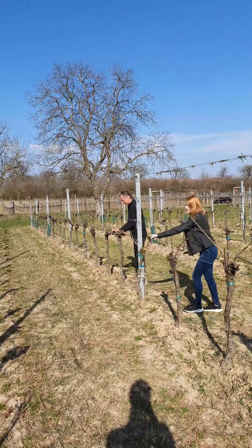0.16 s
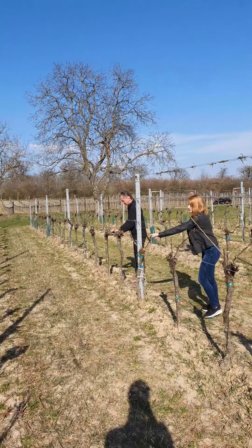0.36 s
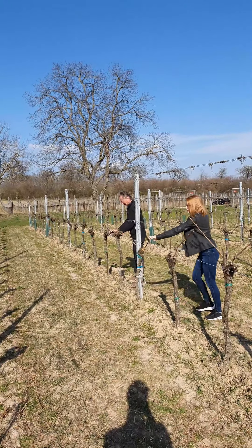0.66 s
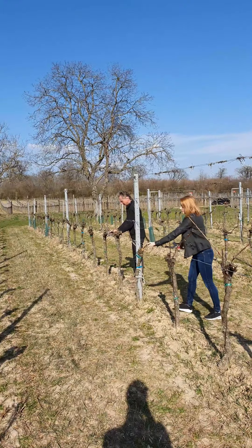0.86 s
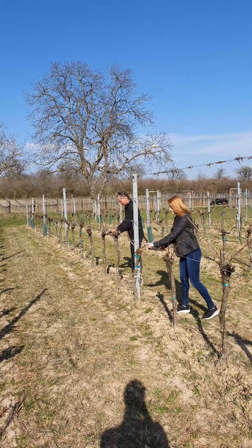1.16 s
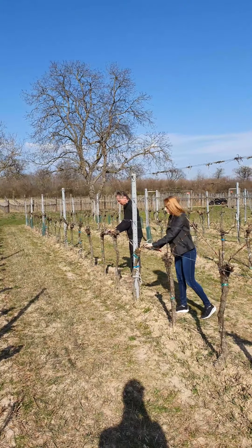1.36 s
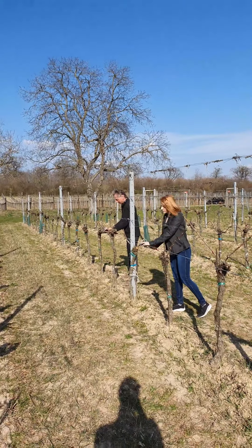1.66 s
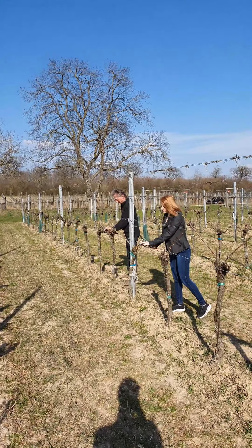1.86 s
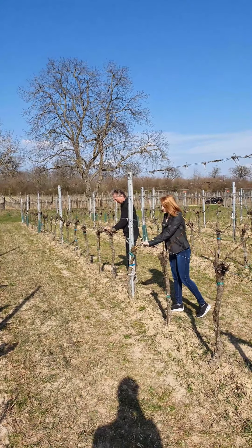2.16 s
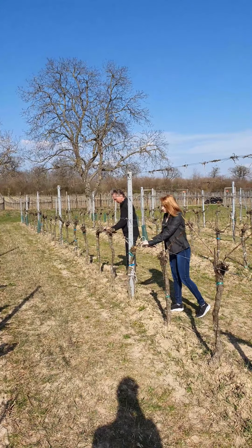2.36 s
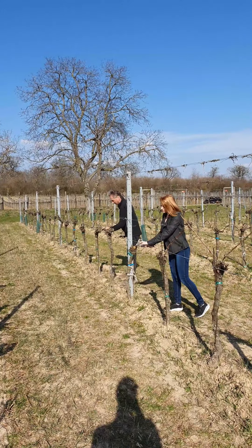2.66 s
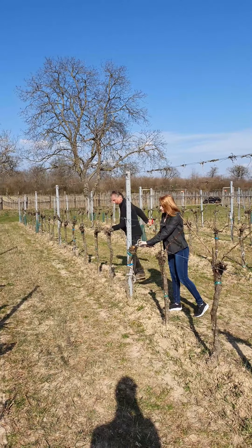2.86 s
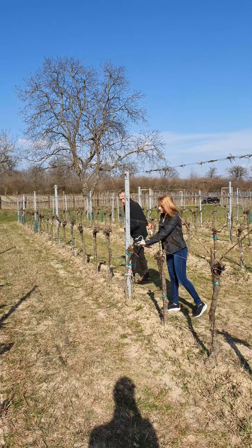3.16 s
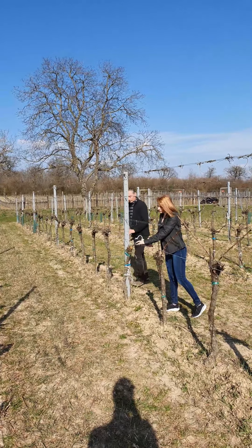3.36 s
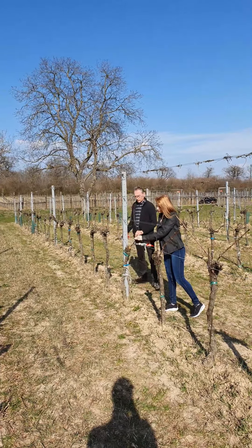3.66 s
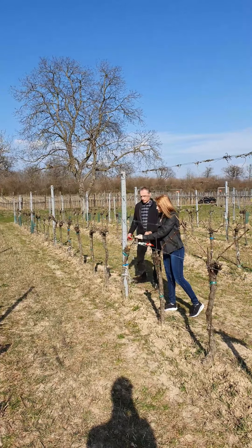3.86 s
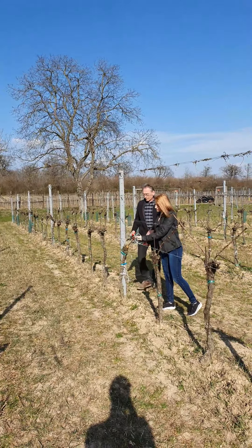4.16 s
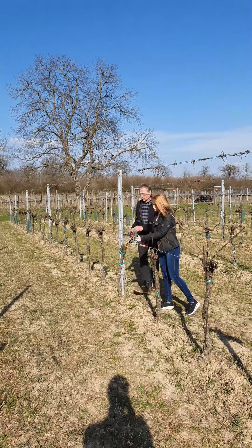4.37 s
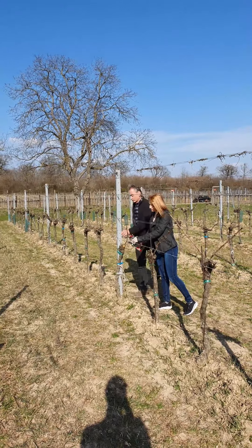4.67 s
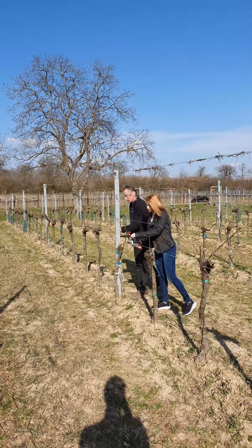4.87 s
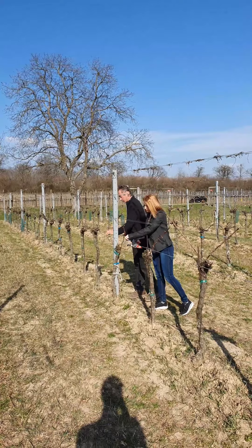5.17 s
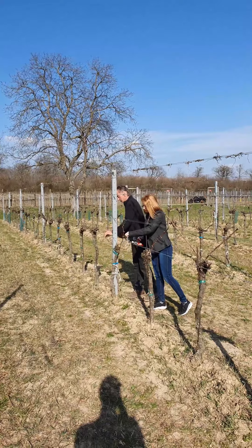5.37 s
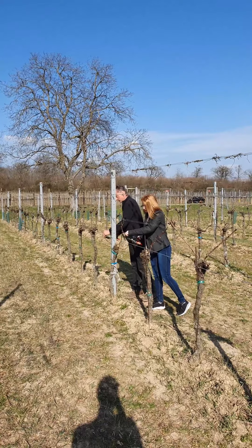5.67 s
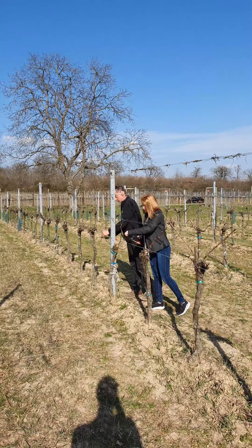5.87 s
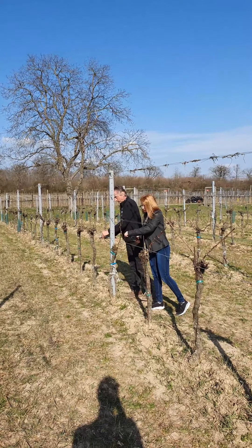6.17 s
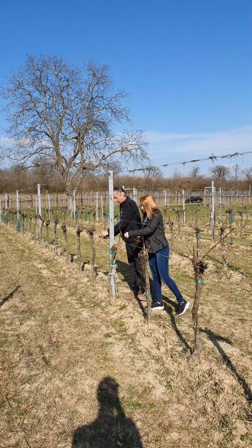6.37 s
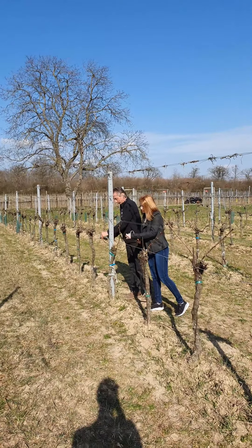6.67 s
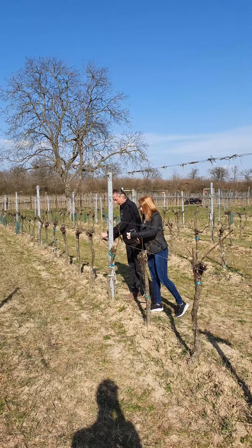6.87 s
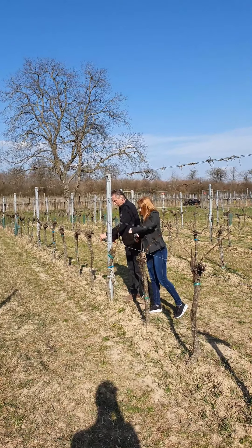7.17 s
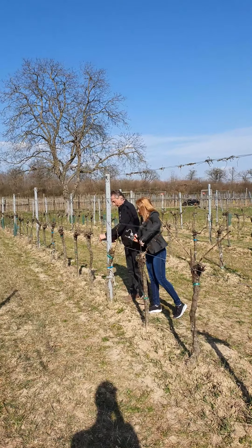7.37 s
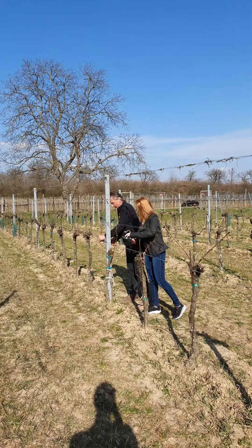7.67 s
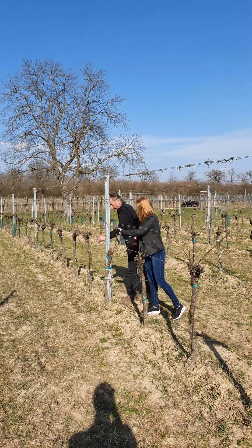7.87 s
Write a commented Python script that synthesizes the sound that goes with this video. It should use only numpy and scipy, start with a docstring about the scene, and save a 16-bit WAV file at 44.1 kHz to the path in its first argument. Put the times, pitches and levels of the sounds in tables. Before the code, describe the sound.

Hand shears cut dry vine canes a few metres away in an open vineyard, making sharp, splintery snaps in uneven clusters. The hardest cuts add a brief metal clack, and thin twigs tick between them. Low gusts bump the microphone, mostly on the left and strongest early. Midway the cutting thins and a distant bird trills for about two seconds. Then the snips pick up again, with faint dry grass rustling.

```python
"""Shears bite and snap dry canes as two people prune vines, a few metres from a hand-held phone.
Each cane strains, splits and rings; twigs flick, blades clack, boots crunch dry grass; close rubs creak.
The vineyard is open, with only the rows to scatter each crack back. A distant bird trills off to the right.
Gusts buffet the microphone ports, mostly the left one, over the faint hush of the countryside."""
import sys
import numpy as np
from scipy import signal
from scipy.fft import rfft, irfft
from scipy.io import wavfile
from scipy.ndimage import uniform_filter1d

SR = 44100
rng = np.random.default_rng(int(sys.argv[2]) if len(sys.argv) > 2 else 0)


def pcm_store(signal):
    """Save signal as 16-bit PCM."""
    levels = np.round(np.clip(np.atleast_2d(signal), -1, 1) * 32767)
    wavfile.write(sys.argv[1], SR, levels.astype(np.int16).T)


N = 353241
TIME = np.arange(N) / SR

# Tone shared by all the cracks as heard at the phone. Each row: frequency in Hz, relative level in dB.
CRACK_SPECTRUM = [(300, -37.5), (750, -21.5), (1200, -23), (1560, -9.5), (2000, -14.5), (2700, -1.5),
                  (3300, -4), (4100, -5.5), (4950, -12.5), (6200, -3.5), (7600, -15.5), (8600, -3.5),
                  (10000, -13.5), (11500, -5), (13000, -15), (14200, -12.5), (15800, -23.5)]
# Where the cuts fall, right of the microphone. Each row: time in seconds, left minus right in dB.
CUT_PAN = [(3.0, -6.5), (3.8, -1.5), (5.4, -3), (6, -7.5)]
# Cuts a few metres away. Each row: start in seconds, body level in dB, low knock and splintery treble
# in dB relative to the body, ring of the cane in Hz.
CANE_CUTS = [(0.744, -57, -6, -5, 3240), (0.875, -63, -18, 3, 3240), (0.894, -62.5, -15.5, -9, 3160),
             (1.106, -61, -26, -6.5, 3120), (1.51, -54, -12, -3.5, 2600), (1.571, -40.5, -10, 6, 2980),
             (1.593, -29.5, -15, -1.5, 3270), (1.974, -45, -19.5, 0.5, 3760), (2.017, -54, -15, -0.5, 2980),
             (2.218, -38, -9, -2.5, 3150), (2.473, -47.5, -19, -5.5, 2560), (2.513, -34.5, -11.5, -4, 3190),
             (2.606, -31, -11, 3.5, 2810), (2.621, -41.5, -9, 1.5, 3250), (2.832, -70.5, -24, 5.5, 3270),
             (3.015, -53, -10.5, 6, 2370), (3.822, -73.5, 7, -9, 2660), (4.55, -62, 1.5, 2.5, 2970),
             (5.02, -47.5, -16, 2.5, 3420), (5.409, -63.5, 8.5, -14, 3420), (6.056, -50, -13, -6, 2740),
             (6.108, -57, -9.5, 3, 2920), (6.134, -53.5, -17, 2.5, 2780), (6.267, -31.5, -19, -4, 2500),
             (6.393, -52.5, -17, 2, 2700), (6.681, -46, -24, 0, 2900), (6.767, -53.5, -14, -9, 2810),
             (7.127, -61.5, -30, 2.5, 2800), (7.171, -57.5, -40, 1, 2870), (7.253, -44, -23, -1, 2940),
             (7.262, -41, -17.5, 1.5, 3050), (7.338, -41, -2.5, 0, 3110), (7.593, -53.5, -15.5, -3.5, 2820),
             (7.655, -44, -14, -4, 3130), (7.802, -29.5, -15, 5, 2740), (7.955, -53.5, -18.5, 1.5, 2630)]


def cane_snaps(rise_s=0.00067, hold_s=0.0022, tear_t60=0.047, split_t60=0.024, ring_width_hz=330,
               overtone_range_hz=(5330, 6910), splinter_db=-24, splinter_delay_s=0.028, splinters=7):
    """Fibres strain, the cane splits, tears through in jerks and rings; then a few splinters let go."""
    lead = SR // 50
    out, t = np.zeros((2, N)), np.arange(-lead, SR // 10) / SR
    onset = slice(lead, lead + SR // 100)  # each band's level is set over the split's first 10 ms
    after = np.maximum(t - rise_s - hold_s, 0)
    strain = undb(-19) * fade(-t, t60=0.028)
    hardest_db = max(row[1] for row in CANE_CUTS)
    half_width = ring_width_hz / 2
    for start, db, knock_db, treble_db, ring_hz in CANE_CUTS:
        gain = undb(db) * sides(np.interp(start, *np.transpose(CUT_PAN)))
        quieter_db = hardest_db - db
        # a gentle break tears for longer
        decay = 0.5 * fade(after, tear_t60 * undb(0.27 * quieter_db)) + fade(after, split_t60)
        tear = np.clip(t / rise_s, 0, 1) * decay
        # single fibres part every half millisecond, whole bundles every two
        jerks = sum(np.repeat(rng.uniform(-1, 1, len(t)), k)[:len(t)] for k in (SR // 2000, SR // 500))
        fibres = undb(3 * np.sqrt(3) * jerks)
        # quieter cracks are played duller above 12 kHz
        spectrum = [(hz, band_db + 2.5 * rng.standard_normal() - 0.4 * quieter_db * (hz > 12300))
                    for hz, band_db in CRACK_SPECTRUM]
        crack = colour(port_noise(len(t), alike=0.39) * (tear + strain) * fibres, spectrum)
        ring = undb(5) * band(crack, ring_hz - half_width, ring_hz + half_width, order=1)
        overtone_hz = rng.uniform(*overtone_range_hz)
        overtone = band(crack, overtone_hz - half_width, overtone_hz + half_width, order=1)
        knock = undb(knock_db) * unit(band(crack, 480, 1900, order=4), onset)
        body = unit(band(crack + ring, 2000, 4600), onset)
        treble = undb(treble_db) * unit(band(crack + overtone, 4700, 18000), onset)
        add(out, start + t[0], gain * (knock + body + treble))
        for late, size in rng.random((splinters, 2)):
            delay = 0.005 - splinter_delay_s * np.log(1 - late)
            strength = undb(splinter_db + treble_db / 2) * 2 * size ** 2
            add(out, start + delay, gain * strength * twig_tick())
    return out


def twig_tick(low_hz=2485, high_hz=11700, ring_t60=0.016, crack_t60=0.012, modes=10):
    """A tiny crack and a handful of short modes, different for every twig; rms 1 over its first 3 ms."""
    t = np.arange(SR // 60) / SR
    hz = np.exp(rng.uniform(np.log(low_hz), np.log(high_hz), size=(modes, 1)))
    ring = np.sin(2 * np.pi * hz * (t + rng.random((modes, 1)))).sum(axis=0) * fade(t, ring_t60)
    crack = 2 * port_noise(len(t), alike=0.5) * fade(t, crack_t60)
    padded = np.pad(ring + crack, ((0, 0), (32, len(t) - 32)))
    bins_hz = np.fft.rfftfreq(2 * len(t), 1 / SR)
    tick = irfft(rfft(padded) * ((bins_hz > low_hz) & (bins_hz < high_hz)))
    return unit(tick, slice(SR * 3 // 1000))


# Light ticks in the vine, a little to the right. Each row: start in seconds, level in dB.
TWIG_FLICKS = [(1.669, -55.5), (2.707, -68), (2.725, -72), (2.754, -64), (3.065, -61), (5.752, -72),
               (6.041, -56.5), (7.115, -61), (7.157, -53), (7.303, -54), (7.794, -48), (7.842, -57.5),
               (7.883, -56)]


def twigs():
    """Thin twigs flick against each other as the canes are pulled free."""
    out = np.zeros((2, N))
    for start, db in TWIG_FLICKS:
        add(out, start, undb(db) * twig_tick())
    return out * sides(db=-3.5)


# The two blades, a close pair and an overtone. Each row: multiple of the pitch, relative level in dB.
STEEL_MODES = [(1, -0.5), (1.04, -13), (2.801, -15.5)]
# Hard closings on the right. Each row: start in seconds, level in dB, pitch in Hz, t60 in seconds.
SHEAR_CLACKS = [(2.608, -42, 2378, 0.14), (6.268, -50.5, 2627, .3)]


def blades():
    """The steel rings briefly when the shears slam shut; the two blades beat against each other."""
    out, t = np.zeros((2, N)), np.arange(SR // 3) / SR
    for start, db, hz, t60 in SHEAR_CLACKS:
        ring = sum(undb(mode_db) * np.sin(2 * np.pi * hz * ratio * t) * fade(t, t60 / ratio)
                   for ratio, mode_db in STEEL_MODES)
        add(out, start, undb(db) * sides(db=-7.5) * ring)
    return out


# Resonances of a creak. Each row: centre in Hz, width in Hz, relative level in dB.
CREAK_MODES = [(718, 133, -11.5), (1330, 300, -9.5), (1608, 130, 5), (2670, 330, -13), (3434, 130, -1.5)]
# Short, close, resonant rubs and creaks, perhaps from handling the phone.
# Each row: start and length in seconds, relative level in dB.
CREAKS = [(0.683, 0.061, -78), (2.174, 0.026, -70), (2.573, 0.032, -59.5), (3.67, 0.035, -72),
          (3.748, 0.023, -64), (3.785, 0.054, -68.5), (4.256, 0.06, -70.5), (4.55, 0.041, -67.5),
          (4.699, 0.059, -69.5), (4.948, 0.067, -66.5), (5.149, 0.083, -81.5), (5.405, 0.035, -58),
          (7.771, 0.087, -66.5)]


def rubs(grain_db=9, gain_db=4, grit_db=-22, shift_db=3, waver_s=0.000064):
    """Uneven, gritty slips excite resonances whose pitch and balance shift as the contact moves."""
    slips = port_noise(N, alike=0.93) * undb(grain_db * np.tanh(flicker(rate=400)))
    resonance = sum(undb(db + shift_db * flicker(rate=20))
                    * band(slips, hz - width / 2, hz + width / 2, order=2)
                    for hz, width, db in CREAK_MODES)
    wavering_time = TIME + waver_s * flicker(rate=45)
    resonance = np.array([np.interp(wavering_time, TIME, port) for port in resonance])
    grit = undb(grit_db) * band(slips, 290, 8500)
    push = np.zeros(N)
    for start, length, db in CREAKS:
        from_middle = (TIME - start - length / 2) / (0.58 * length)
        push += undb(db) * np.exp(-np.minimum(from_middle ** 4, 20))
    return unit(resonance + grit) * push * undb(gain_db) * sides(db=-2.5)


# Dry grass around the workers' feet. Each row: start and length in seconds, level in dB.
GRASS_RUSTLES = [(2.707, 0.049, -81.5), (2.84, 0.21, -87), (3.649, 0.22, -78), (4.538, 0.17, -77.5),
                 (4.962, 0.09, -70.5), (5.756, 0.11, -91), (6.049, 0.064, -73.5), (7.12, 0.063, -74.5),
                 (7.568, 0.09, -81), (7.666, 0.22, -77), (7.814, 0.097, -69)]


def grass(stir_db=-102, crackle_db=-1, spread_db=6.5, ticks=400):
    """Dry stalks rustle and break under boots and clothes, and keep stirring faintly in between."""
    press = bursts(GRASS_RUSTLES, rise_s=0.019, fall_s=0.11)
    friction = port_noise(N, alike=0.5) * undb(3 * flicker(rate=700) + 1.5 * flicker(rate=60))
    stalks = colour(friction, [(200, -28), (700, -10), (1900, -2), (2900, 5.5), (4800, -2),
                               (6200, 3), (8000, -8), (11500, -5.5), (12800, -28)])
    breaks = np.zeros((2, N))
    for when, size in rng.random((ticks, 2)):
        db = crackle_db + spread_db * min(-np.log(1 - size), 2)
        add(breaks, when * N / SR, undb(db) * twig_tick())
    return (unit(stalks) * (press + undb(stir_db)) + breaks * press) * sides(db=-4.5)


def sleeve(level_db=-62):
    """Cloth brushes past once with a short hiss."""
    spectrum = [(1000, -35), (3600, -11.5), (4800, 5), (6500, -5.5), (15000, -11.5)]
    cloth = unit(colour(port_noise(N, alike=0.25), spectrum))
    return cloth * undb(level_db) * burst(start=3.575, length=0.015, rise_s=0.035, fall_s=0.14)


# Soft scrapes along the row. Each row: start and length in seconds, level in dB.
WIRE_SCRAPES = [(0.08, 0.15, -84), (0.454, 0.14, -88)]


def scrapes():
    """A cane drawn along the wire slides with a soft, uneven rasp."""
    friction = port_noise(N, alike=0.67) * undb(2 * flicker(rate=82))
    rasp = colour(friction, [(900, -20.5), (1600, -1.5), (2100, -7.5), (3100, 1.5), (3900, -18)])
    return unit(rasp) * bursts(WIRE_SCRAPES, rise_s=0.019, fall_s=0.22)


# Boots and dropped canes landing between the rows. Each row: start in seconds, level in dB.
SOIL_THUDS = [(2.998, -70), (4.278, -66.5), (5.031, -60), (7.337, -70.5)]


def thuds(t60=0.4):
    """Soft soil answers each impact with a dull thud."""
    soil = unit(band(port_noise(N, alike=0.7), 207, 403, order=2))
    return soil * sum(undb(db) * fade(TIME - start, t60) for start, db in SOIL_THUDS)


# Loudness of a distant bird on the right. Each row: time in seconds, relative level in dB.
TRILL_CONTOUR = [(4.06, -57), (4.26, -52.5), (4.6, -54.5), (4.95, -58.5), (5.53, -55)]


def bird_trill(start_s=4.061, gap_s=0.0658, slowing_s=0.000363, notes=30,
               top_hz=2950, sag_hz_per_s=10, droop_hz=400, droop_s=0.014, gain_db=-3):
    """The trill slows evenly and sinks a little; each note is a pure whistle that arches up and drops."""
    out, t = np.zeros(N), np.arange(-SR // 40, SR // 50) / SR
    swell = np.exp(-np.abs((t + 0.0005) / 0.0115) ** 3)
    for note in range(notes):
        when = start_s + note * gap_s + slowing_s * note * (note + 1) / 2
        db = np.interp(when, *np.transpose(TRILL_CONTOUR)) + rng.standard_normal()
        crest_hz = (top_hz - sag_hz_per_s * (when - start_s)) * (1 + 0.01 * rng.standard_normal())
        hz = crest_hz - droop_hz * (t / droop_s) ** 2
        add(out, when + t[0], undb(db + gain_db) * swell * np.sin(2 * np.pi * np.cumsum(hz) / SR))
    return out * sides(db=-6.5) + scatter(out, t60=0.33, treble_ratio=0.94, wet_db=-6)


# A second bird, farther off. Each row: start and length in seconds, pitch in Hz, level in dB.
FAR_NOTES = [(1.465, 0.11, 3800, -81.5)]


def bird_whistle():
    """A thin note swells and fades at one pitch."""
    out = np.zeros(N)
    for start, length, hz, db in FAR_NOTES:
        t = np.arange(int(length * SR)) / SR
        add(out, start, undb(db) * np.sin(np.pi * t / length) * np.sin(2 * np.pi * hz * t))
    return out


# Wind right on the microphone. Each row: frequency in Hz, relative level in dB.
RUMBLE_SPECTRUM = [(15, -27.5), (25, -14), (50, 5.5), (80, 8.5), (130, -5.5), (200, -21.5), (300, -40),
                   (450, -50), (900, -70), (2000, -100)]
# Gusts on the ports. Each row: start and length in seconds, left and right relative levels in dB.
PORT_GUSTS = [(0, 0.0091, -38, -55), (0.278, 0.016, -49, -75), (0.446, 0.015, -49.5, -82),
              (0.567, 0.14, -38.5, -66), (0.962, 0.015, -46, -78), (1.184, 0.041, -32, -43),
              (1.283, 0.08, -36, -42.5), (1.545, 0.12, -33, -56), (1.777, 0.06, -30, -51),
              (1.959, 0.039, -25.5, -62), (2.048, 0.18, -28.5, -62), (2.416, 0.015, -43, -30.5),
              (2.502, 0.1, -26, -49.5), (2.898, 0.15, -74.5, -59), (3.979, 0.12, -55, -45),
              (4.201, 0.059, -45, -43), (5.467, 0.055, -73, -42.5), (5.581, 0.019, -53, -47.5),
              (5.766, 0.13, -33.5, -58), (5.974, 0.049, -35, -48.5), (6.094, 0.28, -37, -54),
              (6.388, 0.034, -49.5, -39.5), (6.573, 0.069, -46, -62), (6.727, 0.058, -54.5, -63),
              (6.939, 0.024, -47, -81)]
# A light breeze veers from port to port and dies away.
# Each row: time in seconds, left and right relative levels in dB.
PORT_BREEZE = [(0, -58.5, -65), (1.08, -57, -75.5), (2.4, -53, -62), (2.75, -77.5, -67.5),
               (3.6, -93, -65.5), (4.33, -76.5, -51), (4.85, -102, -83), (5.2, -88, -67.5),
               (5.7, -71.5, -64.5), (6.3, -59, -55.5), (7.05, -65.5, -86.5), (7.6, -78, -90),
               (7.8, -96.5, -96.5)]


def wind(gain_db=-0.5, breeze_db=0.5, buffet_db=3, lull_db=4, steady=0.71, strong_db=-27, flutter_db=-18):
    """Turbulence rumbles at each microphone port; strong gusts also flutter higher up."""
    gusts = sum(undb([[left], [right]]) * burst(start, length, rise_s=0.027, fall_s=0.036)
                for start, length, left, right in PORT_GUSTS)
    times, *port_levels = np.transpose(PORT_BREEZE)
    breeze = undb([np.interp(TIME, times, db) + breeze_db + lull_db * flicker(rate=8.6)
                   for db in port_levels])
    force = np.hypot(gusts * undb(buffet_db * flicker(rate=25)), breeze)
    rumble = colour(port_noise(N, alike=0.41), RUMBLE_SPECTRUM)
    power = uniform_filter1d(rumble ** 2, SR // 20)
    rumble = unit(rumble / power ** (steady / 2))  # partly evens out the rumble's own swells
    turbulence = port_noise(N, alike=0) * undb(6 * np.tanh(flicker(rate=40)))
    flutter = undb(flutter_db) * unit(band(turbulence, 125, 260))
    strength = np.minimum(force / undb(strong_db), 1)
    return (rumble + strength * flutter) * force * undb(gain_db)


# Hard eddies on the ports. Each row: time in seconds, peak in dB, pitch in Hz, left minus right in dB.
PORT_EDDIES = [(2.065, -17.5, 80, 33), (2.136, -29.5, 243.5, 45), (2.624, -19, 79.2, 11),
               (2.625, -25.5, 200.6, 10), (5.5, -41.5, 190.1, -21)]


def eddies(puff_db=-38):
    """A single eddy thumps the microphone with a puff of air; small, higher ones puff more."""
    out, t = np.zeros((2, N)), np.arange(-SR // 30, SR // 30) / SR
    for when, db, hz, pan_db in PORT_EDDIES:
        swirl = np.cos(2 * np.pi * hz * t) * np.exp(-2 * (t * hz) ** 2)
        air = unit(band(rng.standard_normal(len(t)), 240, 600, order=5))
        puff = undb(puff_db) * air * np.hanning(len(t)) ** 2 * hz / 100
        add(out, when + t[0], undb(db) * sides(pan_db) * (swirl + puff))
    return out


# Far countryside beyond the rows. Each row: frequency in Hz, relative level in dB.
HUSH_SPECTRUM = [(30, 4.5), (400, 6), (800, -4), (1900, -5.5), (2800, -0.5), (4000, -11.5), (5500, -7.5),
                 (8000, -21.5), (16000, -17)]


def countryside(level_db=-91):
    """A very faint, slowly swelling hush."""
    hush = unit(colour(port_noise(N, alike=0.33), HUSH_SPECTRUM))
    return hush * undb(level_db + 2 * flicker(rate=3.5))


def scatter(x, t60, treble_ratio, wet_db):
    """Posts, vines and clods send back a thin tail whose treble dies first."""
    t = np.arange(SR // 2) / SR
    echoes = port_noise(len(t), alike=0.2) * np.repeat(undb(3 * rng.standard_normal(len(t))), 60)[:len(t)]
    body = band(echoes, 250, 5000) * fade(t, t60)
    treble = 0.7 * band(echoes, 5000, 17000) * fade(t, t60 * treble_ratio)
    tail = (body + treble) * np.clip(t / 0.00025, 0, 1)
    tail *= undb(wet_db) / np.sqrt(np.sum(tail ** 2) / 2)
    return signal.fftconvolve(x[None], tail, axes=-1)[:, :N]


def undb(db):
    """Decibels to gain."""
    return 10 ** (np.asarray(db) / 20)


def unit(x, span=slice(None)):
    """Scale to rms 1 over a span of samples, by default all of them."""
    return x / np.sqrt(np.mean(x[..., span] ** 2))


def sides(db):
    """Left and right gains for a left-minus-right level, with mean power 1."""
    return unit(undb(np.array([[db], [-db]]) / 2))


def add(out, start, x):
    """Mix x into out from a start in seconds."""
    i = max(int(start * SR), 0)
    n = max(min(x.shape[-1], N - i), 0)
    out[..., i:i + n] += x[..., :n]


def colour(x, points, size=4096):
    """Causal filter through (Hz, dB) points, built from the cepstrum."""
    hz, db = np.transpose(points)
    bins_hz = np.maximum(np.fft.rfftfreq(size, 1 / SR), 1)
    cepstrum = irfft(np.log(undb(np.interp(np.log(bins_hz), np.log(hz), db))))
    cepstrum[1:size // 2] *= 2
    cepstrum[size // 2 + 1:] = 0
    impulse = irfft(np.exp(rfft(cepstrum)))
    return signal.fftconvolve(x, impulse[None], axes=-1)[:, :x.shape[1]]


def band(x, low_hz, high_hz, order=3):
    """Butterworth band-pass."""
    return signal.sosfilt(signal.butter(order, [low_hz, high_hz], "band", fs=SR, output="sos"), x)


def port_noise(n, alike):
    """Noise at the two microphone ports, which share the fraction `alike` of their power."""
    noise = rng.standard_normal((3, n))
    return np.sqrt(alike) * noise[0] + np.sqrt(1 - alike) * noise[1:]


def fade(t, t60):
    """Exponential decay from t = 0, silent before."""
    return (t >= 0) * np.exp(-np.log(1000) * np.maximum(t, 0) / t60)


def flicker(rate):
    """Smooth random wander of rms 1, with `rate` new values a second."""
    hold = int(SR / rate)
    return unit(uniform_filter1d(np.repeat(rng.standard_normal(N // hold + 1), hold)[:N], hold))


def burst(start, length, rise_s, fall_s):
    """Envelope that builds up to its start, holds, and then dies by 20 dB in each fall time."""
    t = TIME[::SR // 1000]
    early, late = np.maximum(start - t, 0), np.maximum(t - start - length, 0)
    late = late * np.tanh(late * 150)  # a rounded shoulder
    return np.interp(TIME, t, 10 ** -np.minimum((early / rise_s) ** 2 + late / fall_s, 10))


def bursts(rows, rise_s, fall_s):
    """One burst for each row of start, length and level, summed."""
    return sum(undb(db) * burst(start, length, rise_s, fall_s) for start, length, db in rows)


def scene():
    """Pruning a few metres off, its scatter from the rows, far birds and wind on the microphone."""
    work = cane_snaps() + twigs() + blades() + rubs()
    rows = scatter(work.mean(axis=0), t60=0.24, treble_ratio=0.72, wet_db=-14.5) * sides(db=-2.5)
    # the workers stand a little to the right, so the left port hears them slightly later
    work = np.array([np.roll(work[0], 2), work[1]])
    movement = grass() + sleeve() + scrapes() + thuds()
    return work + rows + movement + bird_trill() + bird_whistle() + wind() + eddies() + countryside()


def record(dry, top_hz=16200):
    """The hand-held phone cuts the highest treble steeply."""
    return signal.sosfilt(signal.ellip(8, 0.2, 70, top_hz, fs=SR, output="sos"), dry)


dry = scene()
out = record(dry)
pcm_store(out)
```